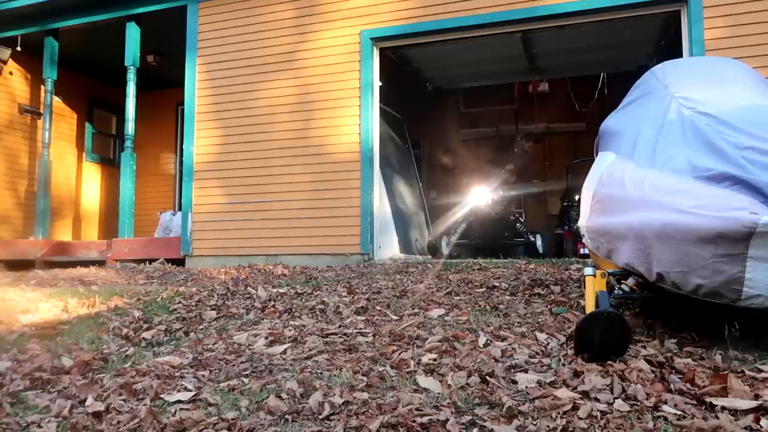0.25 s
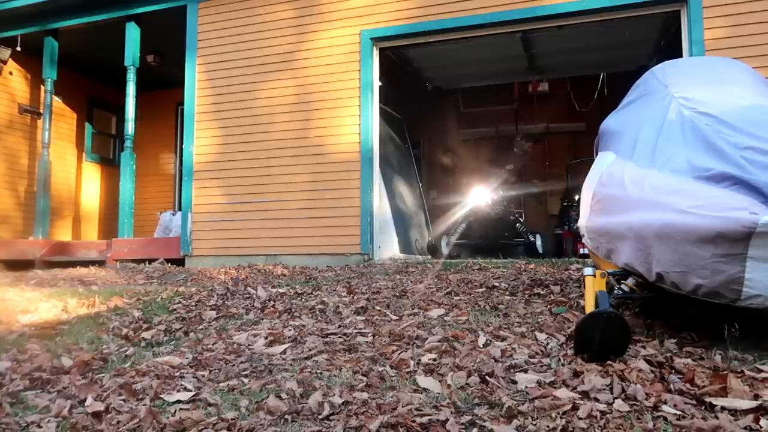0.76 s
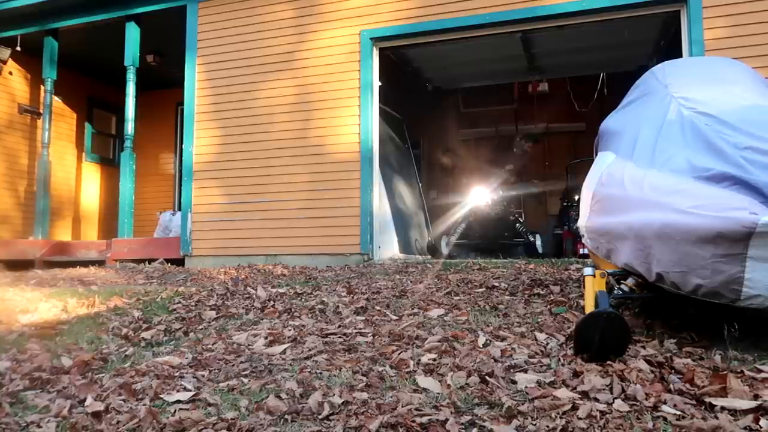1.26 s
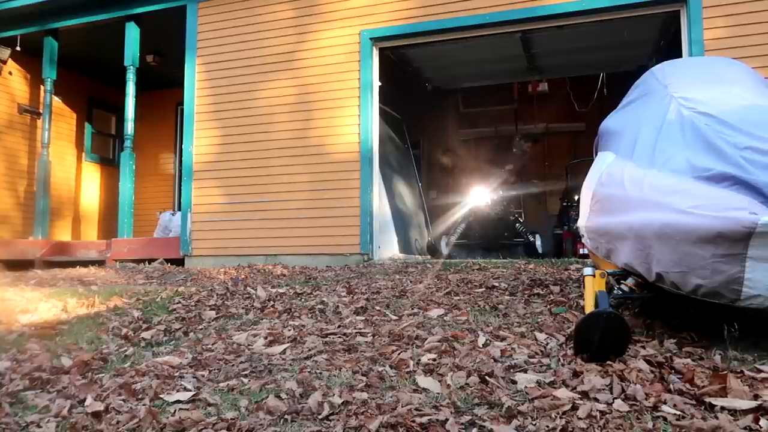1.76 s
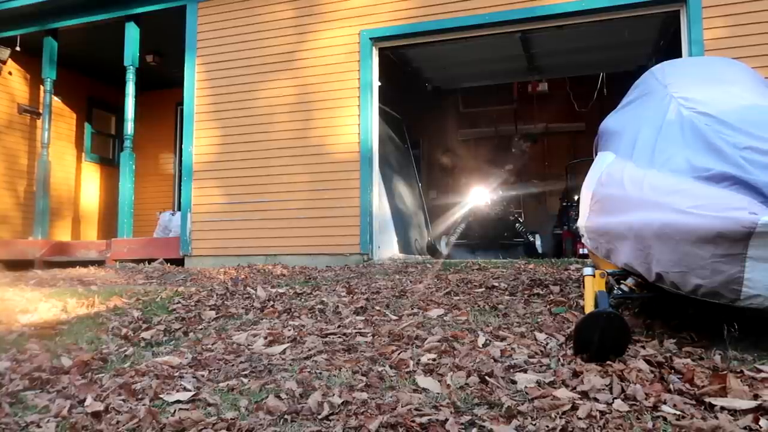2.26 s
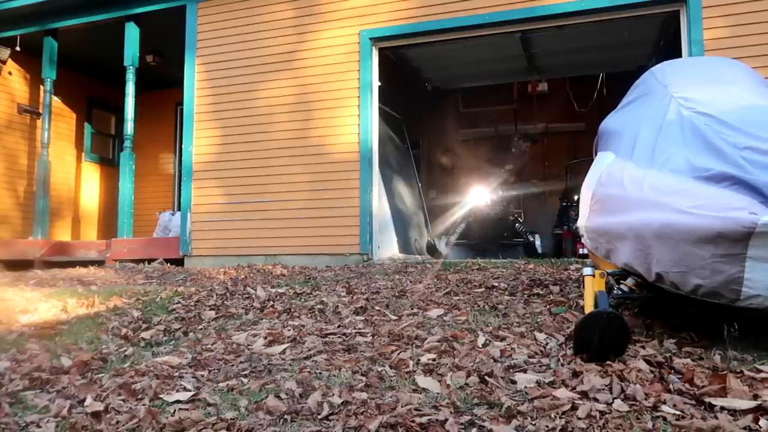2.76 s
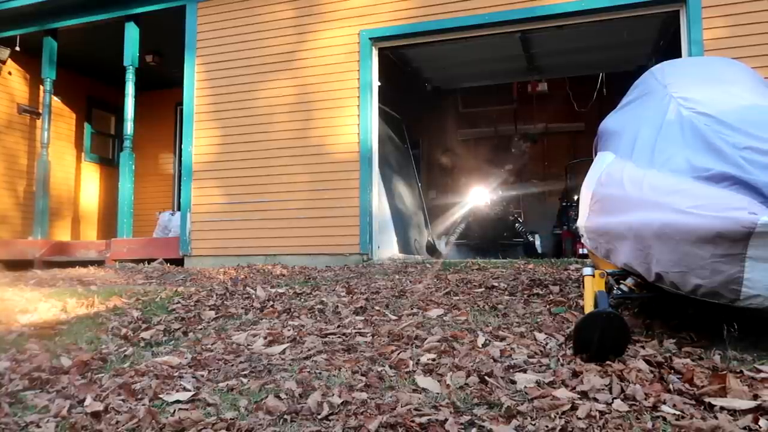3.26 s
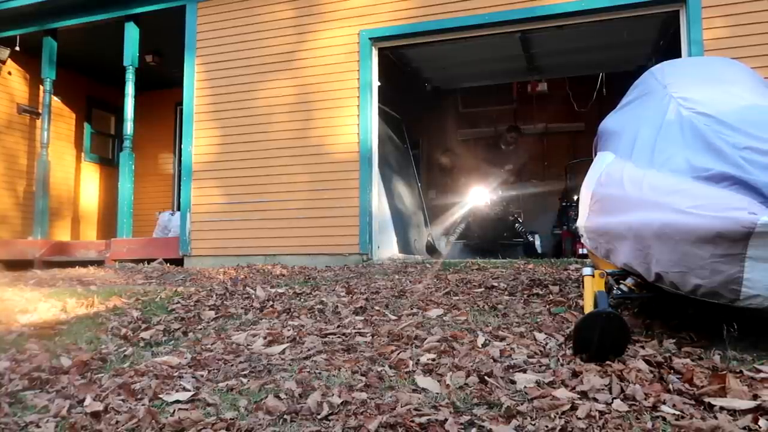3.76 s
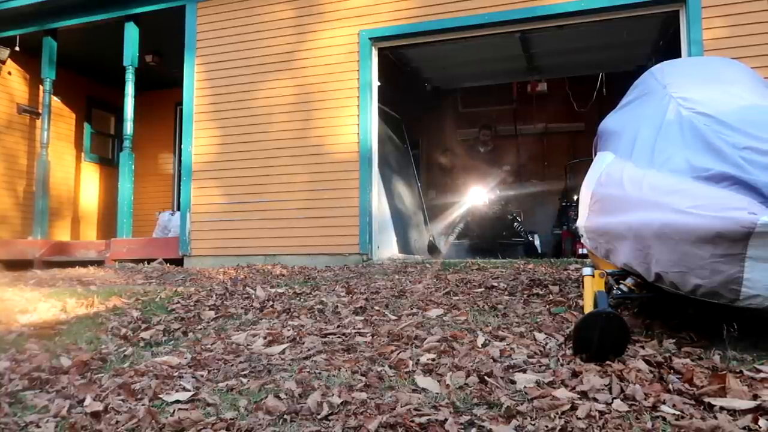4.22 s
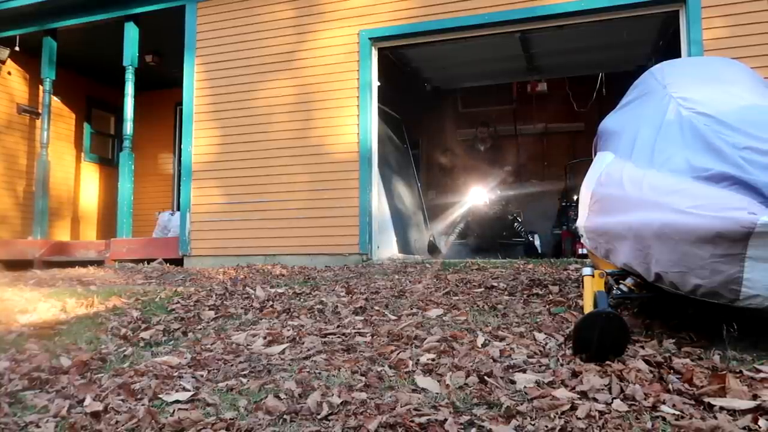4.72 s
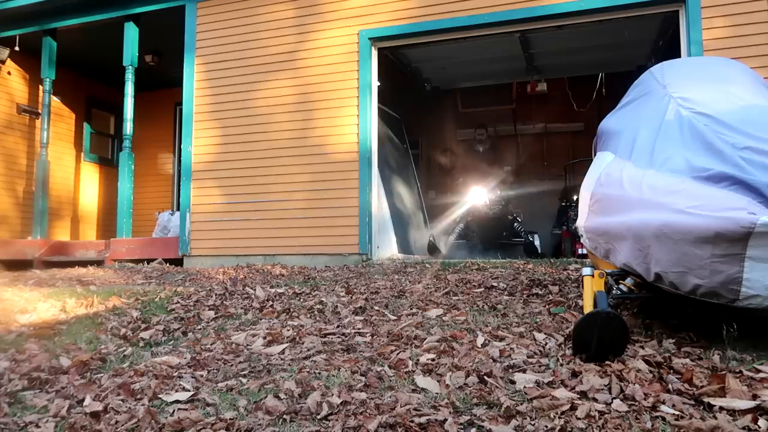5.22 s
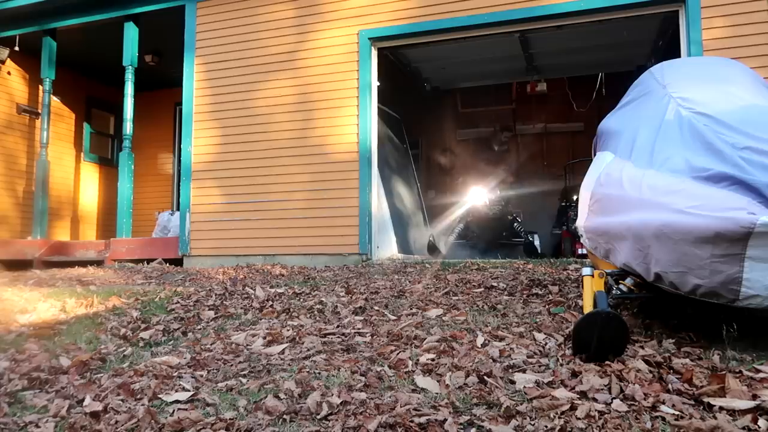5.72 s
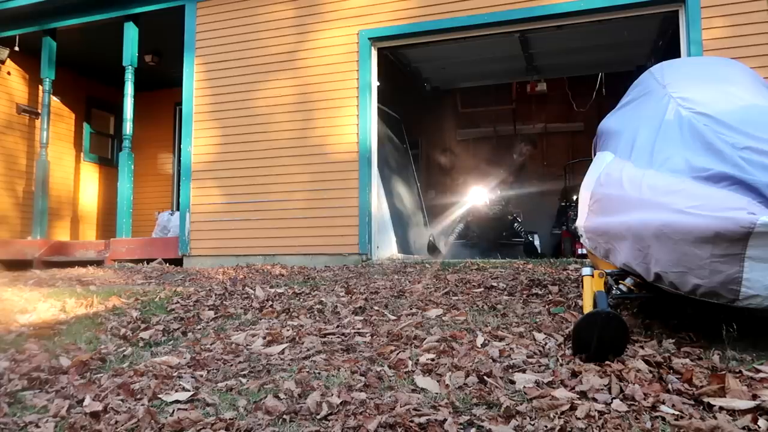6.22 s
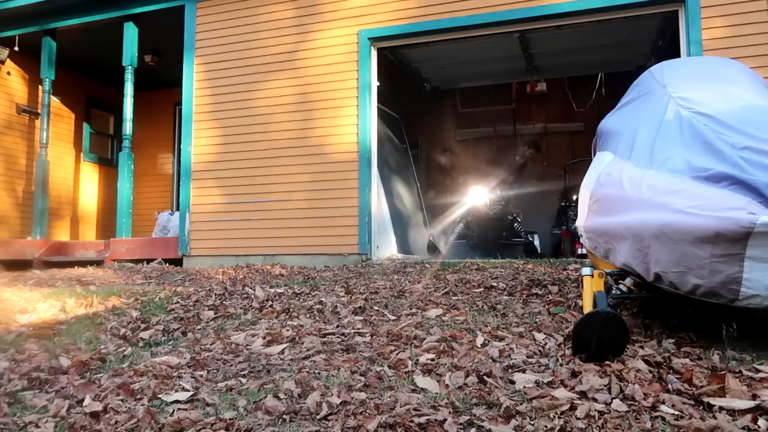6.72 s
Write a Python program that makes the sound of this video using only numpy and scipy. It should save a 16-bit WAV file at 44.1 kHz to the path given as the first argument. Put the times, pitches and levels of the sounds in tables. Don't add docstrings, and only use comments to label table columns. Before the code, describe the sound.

A two-stroke twin engine runs inside an open garage, heard from the drive outside through small, close stereo microphones. The sound begins at the tail of a rev, already dropping. Quick throttle blips follow at about 0.3, 0.6, 1.1, 1.5 and 2.0 seconds, the last a little longer; each climbs fast in pitch, rasps and pops, gulps air with a hiss, then coasts down. From 2.3 to 2.9 it settles into a low, booming idle. Two short blips come at 2.9 and 3.2, with especially hard cracks around 3.0. It stumbles at idle from 3.6 to 4.1 with paired thumps, then four brief blips at 4.15, 4.45, 4.75 and 5.05. After 5.2 it falls back to a lumpy, surging idle until the end near 7 seconds. Thin metallic rattle and belt hiss ride on top; the garage adds a short boomy ring, and the tallest pops are softly rounded.

```python
import sys
import numpy as np
from scipy import signal
from scipy.fft import rfft, irfft, next_fast_len
from scipy.io import wavfile
from scipy.ndimage import uniform_filter1d

SR = 44100
rng = np.random.default_rng(int(sys.argv[2]) if len(sys.argv) > 2 else 0)


def gain_from_decibels(decibels):
    exponent = np.asarray(decibels, float) / 20
    return 10 ** exponent


def dump_mix(stems):
    frames = np.atleast_2d(stems).T
    limited = np.clip(frames, -1, 1)
    pcm = np.round(limited * 32767).astype(np.int16)
    wavfile.write(sys.argv[1], SR, pcm)


N = 307816

# open_s, shut_s, top_firing_hz, coasting_loss_hz_per_s, burn_db
BLIPS = [(-.2, 0.0, 122.2, 120.4, -11), (0.279, 0.491, 112, 84.87, -15), (0.626, 0.871, 129.7, 154.4, -13),
         (1.114, 1.327, 120.9, 154.4, -14.5), (1.507, 1.733, 128.7, 159.9, -10.5),
         (1.971, 2.296, 136.6, 154.6, -12), (2.894, 3.051, 115, 174.6, -17.5),
         (3.208, 3.411, 110.5, 107.8, -12), (4.153, 4.345, 112.1, 128.2, -19.5),
         (4.449, 4.621, 126.7, 148, -13.5), (4.744, 4.887, 128.2, 111.2, -11),
         (5.061, 5.201, 128.1, 141.2, -13.5)]
# start_s, peak_db, gap_s, second_peak_db, surge_db
IDLE_PAIRS = [(2.809, -10, .012, 0, 13.5), (3.652, 0.5, .036, 1, 5), (3.833, -8, .01, 0, 8.5),
              (3.978, -4, 0.014, -3, 13), (4.14, -2.5, .013, -3.5, 9), (5.673, -7.5, 0.013, -2.5, 9.5),
              (5.836, -4, 0.013, -2.5, 5.5), (5.974, -5, 0.038, -6, 6), (6.11, -4, .07, -6, 4.5),
              (6.248, -5.5, 0.073, -11, 2.5), (6.385, -4, .012, -1, 9.5), (6.548, -5, .044, -4.5, 4.5),
              (6.745, -14, .007, -0.5, 9.5), (6.901, -7, 0.039, -4, 10)]
# pitch_hz, level_db (per Hz)
HISS = [(400, -17.5), (800, -5.5), (1200, -12), (1500, -12.5), (2300, -11), (3300, -18), (4300, -26.5),
        (4700, -32), (6300, -35.5), (7500, -45.5), (9000, -62), (11000, -96.5)]


def evened(x):
    return x / np.sqrt(np.mean(x ** 2) + 1e-20)


def colour(points):
    f, db = np.transpose(points)
    size = 2 ** 13
    hz = abs(np.fft.fftfreq(size, 1 / SR))
    level_db = np.interp(np.log(hz + 1), np.log(f + 1), np.maximum(db, -100))
    log_gain = np.log(gain_from_decibels(level_db))
    spectrum = np.exp(log_gain - 1j * signal.hilbert(log_gain).imag)
    return np.fft.ifft(spectrum).real[:size // 2]


def through(x, taps):
    return signal.oaconvolve(x, taps)[:N]


def ring(x, hz, width):
    return signal.lfilter(*signal.iirpeak(hz, hz / width, SR), x)


def wander(hz):
    return evened(signal.sosfilt(signal.butter(2, hz, fs=SR, output="sos"), rng.standard_normal(N)))


def near(hz, centre_hz, width):
    return 1 / (1 + ((hz - centre_hz) / width) ** 4)


def orders(cycles, table, waver_db):
    total = 0
    for multiple, db in table:
        tone = np.sin(2 * np.pi * (multiple * cycles + rng.random()))
        total = total + gain_from_decibels(db + waver_db * wander(hz=15)) * tone
    return total


def exhaust(cycles, at, burn_db):
    # pitch_hz, level_db
    pipe = [(40, -27), (90, -14.5), (150, -0.5), (250, 2.5), (450, -1), (700, -3.5), (1100, -10.5),
            (1600, -16), (2000, -28), (2500, -30.5), (5000, -60), (9000, -87.5)]
    # pitch_hz, width_hz, level_db
    modes = [(88, 18, -5.5), (144, 85, -3), (226, 12, -1.5), (275, 43, -4), (380, 200, -10.5), (449, 25, 7),
             (485, 22, -5.5), (660, 43, -2), (970, 46, 6.5), (1170, 61, 5.5)]
    fires = np.diff(np.floor(cycles), prepend=0) > 0
    unevenness_db = np.interp(burn_db, [-24, -13], [3, 3.5])
    scatter_db = unevenness_db * rng.standard_normal(N // 200)[cycles.astype(int)]
    twin = 1 + 0.12 * (-1) ** np.floor(cycles)
    flame = rng.standard_normal(N) * np.exp(-(cycles % 1) / 0.51)
    step = -colour(pipe)
    steady = evened(through(fires * twin * gain_from_decibels(scatter_db), step))
    steady = steady + gain_from_decibels(-7) * evened(through(flame, step))
    rasp = gain_from_decibels(1.53 * (burn_db + 11) - 29.5) * evened(ring(ring(flame, 1250, 1100), 1300, 1100))

    hard, crack = np.zeros((2, N))
    peak_db = firings()[1]
    hard[at] = gain_from_decibels(np.minimum(peak_db, 4) + .5)
    crack[at] = gain_from_decibels(peak_db - 30 + 2 * rng.standard_normal(len(at)))
    t = np.arange(600) / SR
    snap = through(np.diff(rng.standard_normal(601)) * np.exp(-t / 0.012), colour(HISS))
    blast = gain_from_decibels(burn_db - 9) * steady + through(hard, step / abs(step).max()) + rasp
    ringing = gain_from_decibels(-5) * sum(gain_from_decibels(db) * ring(blast, hz, width) for hz, width, db in modes)
    return blast + ringing + through(crack, snap / abs(snap).max())


def firings():
    # first_s, gap_s, count, peak_db
    stutters = [(.185, 0, 1, 1.5), (.389, 0.044, 3, -1), (.577, 0.0082, 1, -5), (0.657, 0.039, 6, -2),
                (.917, 0.0018, 1, 3), (1.11, .0315, 3, -4.5), (1.232, 0.0095, 1, 1),
                (1.251, 0.031, 2, -1.5), (1.515, 0, 1, -3), (1.576, 0.036, 2, -3), (1.664, 0, 1, -1.5),
                (2.019, 0.053, 2, -0.5), (2.098, 0.021, 2, -1.5), (2.158, 0.01, 3, -4), (2.208, 0, 1, -1),
                (2.323, 0.042, 2, -1.5), (2.924, 0.031, 2, -4), (2.969, 0.037, 3, 5.5),
                (3.283, 0.0096, 2, -1.5), (3.323, .049, 2, 0.5), (4.217, .011, 2, -4),
                (4.262, 0.04, 2, 0.5), (4.545, 0.012, 2, -4.5), (4.594, 0.0033, 3, -1.5), (4.713, 0, 1, -6),
                (4.766, 0.013, 3, -3.5), (4.902, 0.0039, 1, -5), (5.032, 0.022, 2, -4.5), (5.11, 0, 1, 0),
                (5.164, 0.035, 2, -1)]
    # start_s, peak_db, gap_s, second_peak_db
    coast_pairs = [(.073, 2.5, 0.039, 0), (.302, 0, 0.036, -7), (1.382, -4.5, .049, -3.5),
                   (1.91, -3, 0.072, -4), (2.474, -12, 0.052, -1), (2.627, -4.5, 0.064, -6.5),
                   (3.165, -5.5, .031, -3), (3.399, -6, .014, -4.5), (3.517, 1, 0.029, -1),
                   (4.357, -2.5, 0.033, -2.5), (4.452, 0, .038, -5.5), (5.308, -8, 0.044, -10.5),
                   (5.435, -9, 0.083, -4), (5.58, -10.5, 0.057, -18)]
    rows = [(first + k * gap, db) for first, gap, count, db in stutters for k in range(round(count))]
    for s, db, gap, second_db, *_ in coast_pairs + IDLE_PAIRS:
        rows += [(s, db), (s + gap, second_db)]
    return np.transpose(sorted(rows))


def crank(rate):
    s, peak_db = firings()
    at = (s * SR).astype(int) + 85
    strong = at[peak_db > -11.5]
    kicks = np.zeros(N)
    kicks[strong] = 1
    kicks = uniform_filter1d(kicks, size=900, origin=400)
    gained = signal.lfilter([1], [1, -np.exp(-1 / (.12 * SR))], kicks)
    gained -= uniform_filter1d(gained, size=9000)
    rate = rate * (1 + .045 * gained * (73 / rate) ** 4)
    cycles = np.cumsum(rate * (1 + .005 * wander(hz=22.65))) / SR
    gaps = np.diff(cycles[strong], prepend=0)
    slips = (np.round(gaps) - gaps) * (rate[strong] < 98)
    pull = np.interp(np.arange(N), strong, np.cumsum(slips))
    return rate, cycles + uniform_filter1d(pull, size=2500), at


def speed(t):
    idle_hz, knee_hz, landing_s, flywheel_s = 71.05, 8.7, .15, .05
    s, hz = [], []
    reopenings = [row[0] for row in BLIPS[1:]] + [t[-1]]
    for (_, shut, top_hz, loss, _), reopen in zip(BLIPS, reopenings):
        knee = shut + (top_hz - idle_hz - knee_hz) / loss
        coast = [shut, knee, knee + landing_s]
        kept = [moment for moment in coast if moment < reopen] + [reopen]
        s += kept
        hz += list(np.interp(kept, coast, [top_hz, idle_hz + knee_hz, idle_hz]))
    return uniform_filter1d(np.interp(t, s, hz), round(flywheel_s * SR))


def swell(t, full, shut, top_db, rise, fade, idle_db):
    below = np.maximum(np.maximum(rise * (full[:, None] - t), fade * (t - shut[:, None])), 0)
    return np.maximum((top_db[:, None] - below).max(0), idle_db)


def controls():
    # firing_hz, level_db
    boom = [(72, -7.5), (78, -15.5), (85, -23), (100, -20.5), (130, -28.5)]
    t = np.arange(N) / SR
    opened, shut, top_hz, _, top_db = np.transpose(BLIPS)
    surge_peak_s, surge_settle_s, surge_hz_per_db = .04, .07, .3
    late = np.maximum(t - np.array([row[0] for row in IDLE_PAIRS])[:, None], 0) / surge_peak_s
    surge = np.array([row[4] for row in IDLE_PAIRS]) @ (late * np.exp(1 - late))
    rate = speed(t)

    full = opened + 0.57 * (shut - opened)
    burn_db = swell(t, full, shut, top_db, rise=50.5, fade=70, idle_db=-28.5)
    gulp = opened + .6 * (shut - opened)
    gain = (top_hz - np.interp(opened, t, rate)) / (shut - opened) / 100
    gulp_db = -29 + 0.5 * (gain - 1)
    hiss_idle_db = -35.5
    hiss_db = swell(t, gulp, gulp, gulp_db, rise=49.5, fade=27.5, idle_db=hiss_idle_db)
    lift_db = hiss_db - hiss_idle_db
    lagging = np.interp(t - 0.033, t, rate)
    boom_db = np.interp(lagging, *np.transpose(boom)) + 0.6 * lift_db - surge
    rumble_db = -30.5 + 0.38 * lift_db + 0.63 * surge
    keep = np.exp(-1 / (surge_settle_s * SR))
    rate = rate + surge_hz_per_db * signal.lfilter([1 - keep], [1, -keep], 2 * surge)
    return rate, boom_db, burn_db + 0.38 * surge, hiss_db, rumble_db


def song(rate, cycles, burn_db):
    # multiple, level_db
    harmonics = [(1, -6), (2, -9), (3, -2), (4, -5), (5, -12), (6, -13), (8, -14), (9, -14)]
    gaining = np.clip(uniform_filter1d(np.gradient(rate) * SR, size=2500) / 60 + .4, .15, 1)
    level = np.interp(rate, [85, 100], [0, 1]) * gaining * gain_from_decibels(burn_db - 2.5)
    return level * orders(cycles, harmonics, waver_db=3)


def pumping(rate, cycles, boom_db, rumble_db):
    # multiple of the firing rate, level_db
    pump = [(1, -20), (4, -16), (5, -24), (6, -15), (7, -24)]
    # pitch_hz, level_db (per Hz)
    rumble = [(15, -33), (40, -12), (60, 2.5), (75, -16.5), (88, 13), (105, 0), (122, 14), (150, 10),
              (250, -58)]
    tuned = near(2 * rate, 136.8, 13.5)
    boom = np.sqrt(2) * np.cos(4 * np.pi * cycles - 1.5)
    third = near(3 * rate, 232, 24) * orders(cycles, [(3, -23)], waver_db=4)
    hum = evened(ring(ring(rng.standard_normal(N), 133.4, 55), 133.4, 55))
    blur = evened(through(rng.standard_normal(N), colour(rumble)))
    beside = gain_from_decibels(-10.5) * near(2 * rate, 146.5, 24) * orders(cycles, pump, waver_db=2.5)
    booming = gain_from_decibels(boom_db + 1) * (tuned * boom + (1 - tuned) * 1.23 * hum)
    return booming + beside + third + gain_from_decibels(rumble_db + 4.0) * blur


def hiss(cycles, hiss_db):
    puff = 1.8 + np.exp(-(cycles % 1) / 0.78)
    flicker = gain_from_decibels(1.8 * wander(hz=30.0))
    air = through(rng.standard_normal(N) * puff * flicker, colour(HISS))
    return gain_from_decibels(hiss_db + 2.5) * evened(air)


def fizz(at, hiss_db):
    # pitch_hz, level_db (per Hz)
    tin = [(6000, -43.5), (8000, 0), (9200, -21.5), (10500, -1), (11800, -0.5), (14000, -6.5), (15500, -13),
           (16200, -41.5)]
    jolts = np.zeros(N)
    jolts[at] = rng.exponential(1, len(at))
    jolts[0] = 26.0
    shake = 1 + .9 * through(jolts, np.exp(-np.arange(900) / 250.0))
    shared, left, right = rng.standard_normal((3, N))
    ports = [evened(through(1.2 * shared + own, colour(tin))) for own in (left, right)]
    level_db = 1.05 * (hiss_db + 32.0) - 62.5 + 1.4 * wander(hz=18)
    return gain_from_decibels(level_db) * shake * np.array(ports)


def garage(x):
    # pitch_hz, t60_s
    decay = [(100, 0.64), (400, 0.23), (1200, 0.66), (4000, 0.23), (10000, 0.075)]
    taps = np.zeros(SR // 2)
    at = np.arange(200, SR // 2 - 20, 20)
    taps[at + rng.integers(0, 20, len(at))] = rng.choice([-1., 1.], len(at))
    hz, t, z = signal.stft(taps, SR, nperseg=256)
    t60 = np.interp(hz, *np.transpose(decay))[:, None]
    tail = signal.istft(z * gain_from_decibels(-60 * t / t60), SR, nperseg=256)[1]
    return through(x, tail / np.linalg.norm(tail))


def doorway(x):
    # pitch_hz, level_db
    valleys = [(200, -2), (228, 2), (255, -2.5), (290, 3), (315, -6.5), (350, 1), (510, .5), (560, -2)]
    return through(x, colour(valleys))


def lean(x, tilt):
    # pitch_hz, left_minus_right_db
    balance = [(20, 0), (200, 0), (600, -.6), (2000, -1.2), (4000, -2), (7000, -.2)]
    f, db = np.transpose(balance)
    size = next_fast_len(N + SR)
    hz = np.fft.rfftfreq(size, 1 / SR)
    gain = gain_from_decibels(tilt * np.interp(np.log(hz + 1), np.log(f), db))
    return irfft(rfft(x, size) * gain, size)[:N]


def port_pair(mid):
    # pitch_hz, level_db
    apart = [(200, -60), (350, -40), (1000, -33), (2000, -24), (3500, -9), (4500, -3), (9000, -5)]
    scatter = rng.standard_normal(4000) * np.exp(-np.arange(4000) / 900.)
    unlike = through(through(mid, scatter / np.linalg.norm(scatter)), colour(apart))
    left = lean(.35 * mid + .65 * np.append(0, mid[:-1]), tilt=.5)
    return np.array([left + unlike, lean(mid, tilt=-.5) - unlike])


def scene():
    rate, boom_db, burn_db, hiss_db, rumble_db = controls()
    rate, cycles, at = crank(rate)
    pipe = exhaust(cycles, at, burn_db)
    mid = doorway(pipe + gain_from_decibels(-6.5) * garage(pipe) + song(rate, cycles, burn_db))
    mid = mid + pumping(rate, cycles, boom_db, rumble_db) + hiss(cycles, hiss_db)
    return port_pair(mid) + fizz(at, hiss_db)


def low_pass(x):
    return signal.sosfilt(signal.butter(12, 15700, fs=SR, output="sos"), x)


def record(dry):
    knee = .7
    over = np.maximum(abs(dry) - knee, 0)
    rounded = np.minimum(abs(dry), knee) + (1 - knee) * np.tanh(over / (1 - knee))
    return low_pass(np.sign(dry) * rounded)


dry = scene()
out = record(dry)
dump_mix(out)
```